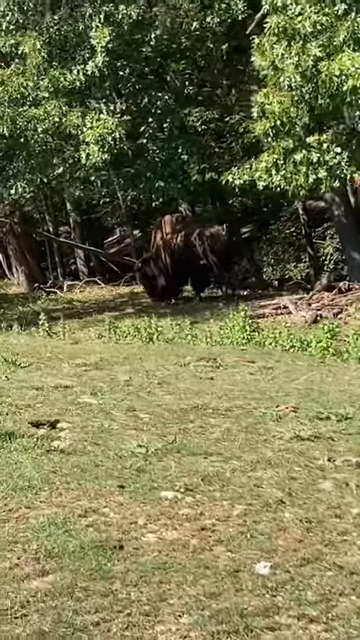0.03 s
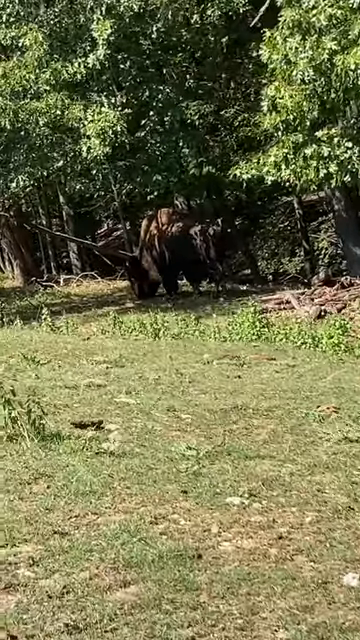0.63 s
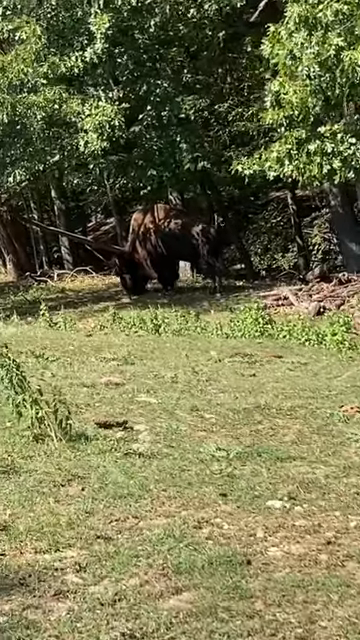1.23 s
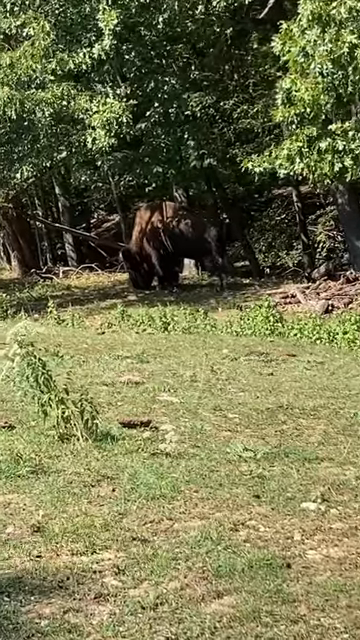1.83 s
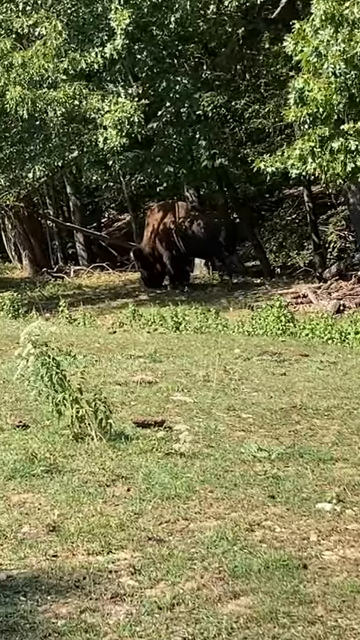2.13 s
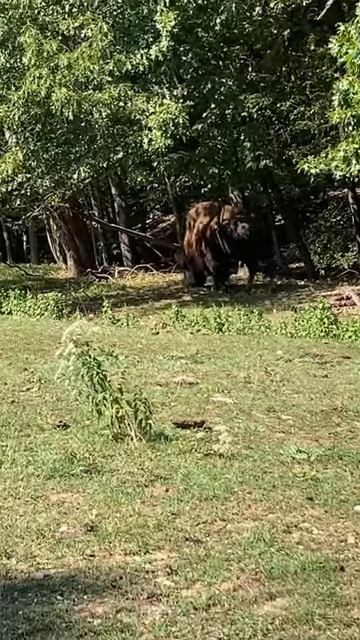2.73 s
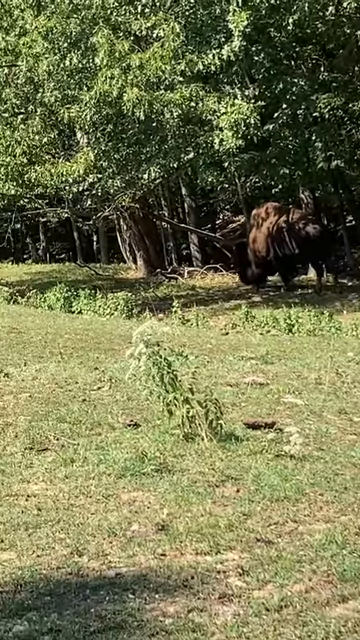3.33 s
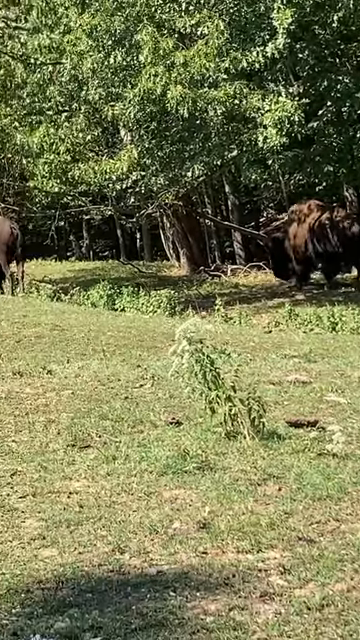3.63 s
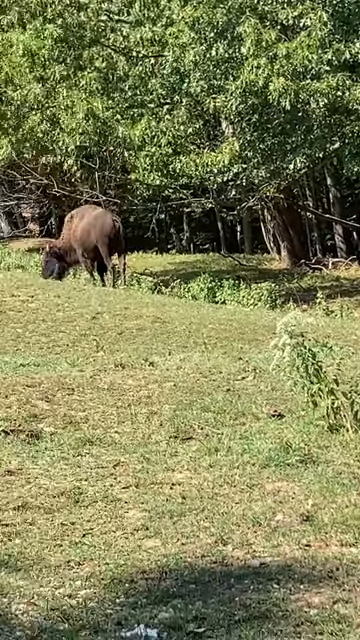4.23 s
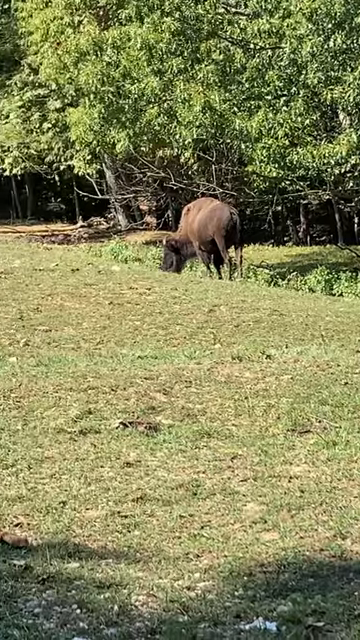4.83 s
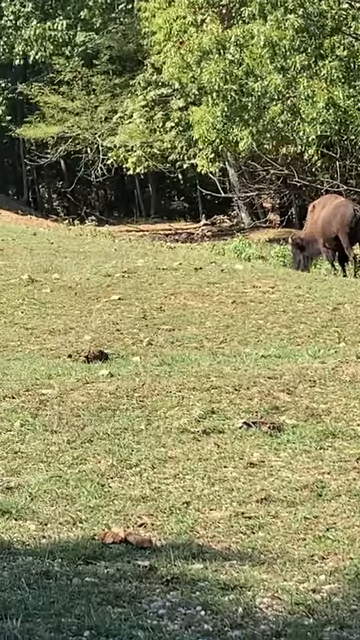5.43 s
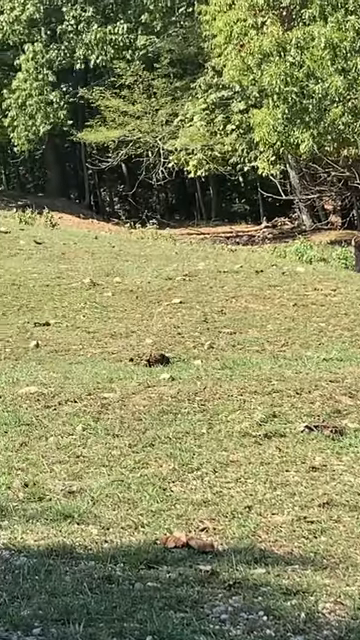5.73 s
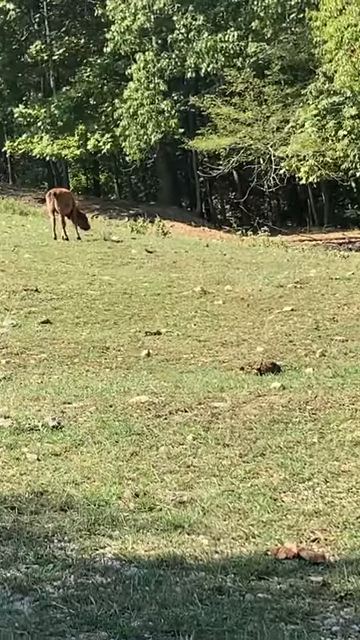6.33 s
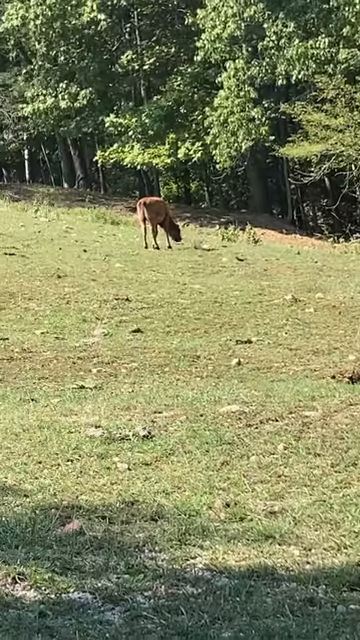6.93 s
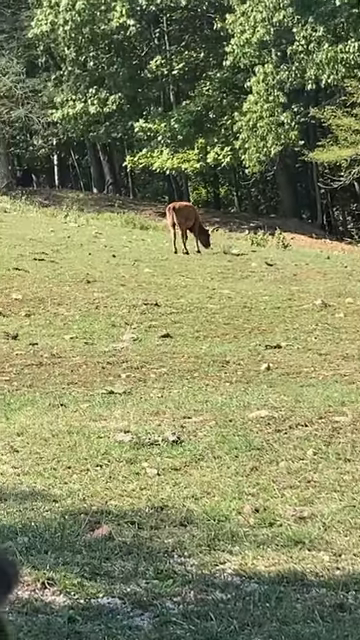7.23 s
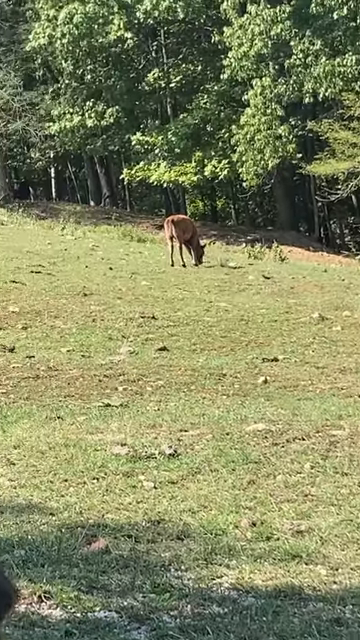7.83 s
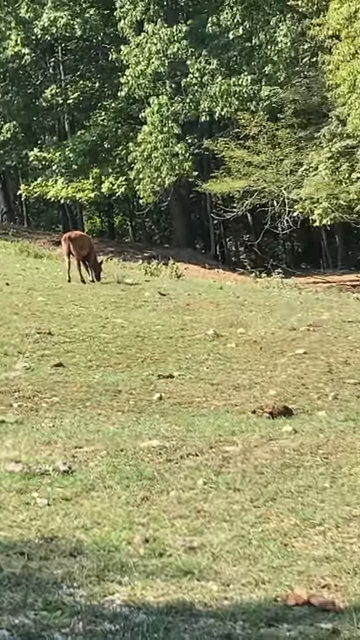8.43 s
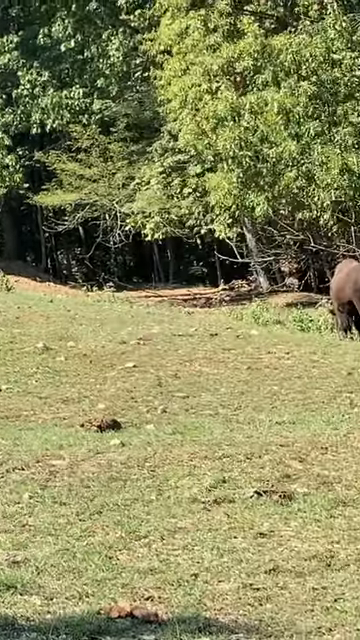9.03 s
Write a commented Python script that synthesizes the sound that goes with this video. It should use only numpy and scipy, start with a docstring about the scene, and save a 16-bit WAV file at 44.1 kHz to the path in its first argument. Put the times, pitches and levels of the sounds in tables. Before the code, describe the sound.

A vehicle engine idles close by in an open field for the whole nine seconds, a low exhaust hum with soft knocking, light clatter and a faint airy hiss behind it. The boom swells just before 1 second, dips briefly and returns at about 1.7 seconds. In the first two seconds a loose metal panel rings faintly three times, slightly to the left, and the engine sags to a slower throb. It stays there from about 2 to 6 seconds, the boom gently rising and falling. Around 6 seconds the engine picks up a little, the boom peaks, and a thin cover whirrs and chirps a bit more, though still quietly. The slightly faster idle then holds steadily to the end, with the panel still giving an occasional faint ring.

```python
"""A three-cylinder engine idles close by in an open field. From the start its exhaust hums and booms,
one cylinder knocks and the block clatters with the firings, under an airy hiss that leads on the left.
In the first two seconds a loose panel sings out three times and the engine sags to a slow throb.
Around 6 s it picks up again: the boom peaks and a thin cover whirrs and chirps louder.
It holds that fast idle to the end, the panel still ringing now and then."""
import sys
import numpy as np
from scipy import signal
from scipy.fft import rfft, irfft, next_fast_len
from scipy.io import wavfile
from scipy.ndimage import uniform_filter1d, map_coordinates

SR = 44100
rng = np.random.default_rng(int(sys.argv[2]) if len(sys.argv) > 2 else 0)


def int16_out(signal):
    """Quantize to a 16-bit WAV file."""
    q = np.round(np.clip(np.atleast_2d(signal).T, -1, 1) * 32767)
    wavfile.write(sys.argv[1], SR, q.astype(np.int16))


N = 405279
TIME = np.arange(N) / SR
SLOW_RPM, FAST_RPM = 1128, 1190  # slow and fast idle: pace 0 and pace 1


def amp(db):
    """Decibels to gain."""
    return 10 ** (np.asarray(db) / 20)


def unit(x):
    """x at rms 1."""
    return x / np.sqrt(np.mean(x ** 2) + 1e-20)


def along(points, hz):
    """Read (f/Hz, value) points on a log frequency axis."""
    freqs, values = np.transpose(points)
    return np.interp(np.log(hz + 1), np.log(freqs + 1), values)


def automation(points):
    """A line through (t/s, value) points, one value a sample."""
    return np.interp(TIME, *np.transpose(points))


def fade(start, length, ramp_s):
    """An envelope that rises, holds and falls, its ramps centred on the start and the end."""
    return np.clip(np.minimum(TIME - start, start + length - TIME) / ramp_s + .5, 0, 1)


def wobble(rate):
    """A smooth random curve, rate knots a second."""
    return map_coordinates(rng.standard_normal(int(N * rate / SR) + 4), [np.arange(N) * rate / SR])


def filtered(x, response):
    """x through a complex frequency response."""
    size = next_fast_len(N + SR // 2)
    return irfft(rfft(x, size) * response(np.fft.rfftfreq(size, 1 / SR)), size)[..., :N]


def coloured(x, spectrum):
    """x through an EQ curve, at rms 1."""
    return unit(filtered(x, lambda hz: amp(along(spectrum, hz))))


def ringing(x, modes):
    """x through (f/Hz, width/Hz, level/dB) resonances, at rms 1."""
    def response(f):
        return sum(amp(db) * 1j * f * width / (hz * hz - f * f + 1j * f * width)
                   for hz, width, db in modes)
    return unit(filtered(x, response))


def cyclic_noise(cycle, repeat_db, size=4096):
    """Two noises that partly repeat every engine cycle, as the same parts strike again."""
    loops = rng.standard_normal((2, size))
    repeats = np.array([map_coordinates(loop, [cycle % 1 * size], mode="grid-wrap") for loop in loops])
    return unit(amp(repeat_db) * repeats + rng.standard_normal((2, N)))


def firing(cycle, depth_db, uneven_db):
    """Tremolo from the three firings of a cycle, one cylinder harder than the others."""
    angle = 2 * np.pi * cycle
    return unit(amp(depth_db * np.cos(3 * angle) + uneven_db * np.cos(angle)))


# Stereo image, 1 being fully alike: f/Hz, left-right likeness
LIKENESS = [(100, 0.81), (280, 0.98), (700, 0.59), (1500, 0.92), (2300, 0.71), (3100, 0.18), (4100, 0.47),
            (4800, 1), (5400, 1), (6800, 0.84), (8200, 0.99), (10000, 1), (11400, 1), (12500, 1),
            (15000, 0.28)]
# How far the left side runs ahead: f/Hz, phase/rad
LEFT_LEAD = [(100, 0), (300, .05), (780, .7), (1600, .7), (2350, 3.2), (3300, 4.3), (4300, 2.45),
             (4900, 3.0), (5500, 3.3), (6700, 4.3), (8200, 6.2), (9400, 6.8), (10700, 8.1), (11300, 9.3),
             (12400, 9.55), (13100, 10.2), (14000, 12.3)]
def stereo(pair, lead=1):
    """Two unrelated signals become left and right: alike in the bass, the left leading in the treble."""
    def spread(hz):
        angle = np.arccos(np.clip(along(LIKENESS, hz), -1, 1)) / 2
        return np.array([np.cos(angle), np.sin(angle)])
    mid, side = filtered(pair, spread)
    left_right = np.array([mid + side, mid - side])
    return filtered(left_right, lambda hz: np.exp(.5j * lead * np.outer([1, -1], along(LEFT_LEAD, hz))))


def patchy_noise(depth_db=1.1):
    """Two noises whose colour drifts in slow patches."""
    spectra = signal.stft(rng.standard_normal((2, N)), nperseg=512)[2]
    patches = uniform_filter1d(rng.standard_normal(spectra.shape[1:]), size=6, axis=0)
    patches = uniform_filter1d(patches, size=50, axis=1)
    return signal.istft(spectra * amp(depth_db * unit(patches)), nperseg=512)[1][:, :N]


# EQ of the airy hiss: f/Hz, relative level/dB
AIR_EQ = [(1000, -5.5), (2500, -2), (3700, -1.5), (4600, -1), (5300, -1), (6500, -1.5), (7400, -0.9),
          (8200, -0.7), (9300, -6), (11000, -21), (15700, -24)]
# Its fader, before a fixed boost: t/s, level/dB
AIR_FADER = [(0.0, -60), (0.74, -61), (1.56, -61.5), (3.2, -60.5), (4.94, -60.5), (5.99, -62.5),
             (7.2, -59.5), (8.6, -60), (9.19, -58)]
# EQ of the sheen on top: f/Hz, relative level/dB
SHEEN_EQ = [(5000, -8), (8000, -7.5), (9300, 2), (10400, 6.5), (12000, -5), (14000, -5.5), (15700, -14)]
def hiss(cycle):
    """A bed of air under a slowly rising sheen, both fluttering faintly with the firings."""
    air = amp(automation(AIR_FADER) + 6.5) * coloured(patchy_noise(), AIR_EQ)
    sheen = amp(-61.5 + 0.2 * TIME) * coloured(patchy_noise(), SHEEN_EQ)
    bed = (air + sheen) * firing(cycle, depth_db=0.7, uneven_db=0.5) * amp(0.28 * wobble(11))
    shift = np.clip(TIME - 6.66 + .5, 0, 1)  # the image shifts slightly over one second
    return (1 - shift) * stereo(bed) + shift * stereo(bed, lead=0.96)


def loose_part(cycle, db, hz, width_hz):
    """One sharp resonance shaken by the engine, chattering as its contact comes and goes."""
    mode = [(hz, width_hz, 0)]
    shake = cyclic_noise(cycle, repeat_db=-12) * firing(cycle, depth_db=-1.5, uneven_db=-0.5)
    chatter = amp(2 * wobble(45))
    return amp(db) * unit(ringing(ringing(shake, mode), mode) * chatter)


# Fader of the thin cover's chirps, with the whirr just under them: t/s, level/dB
COVER_FADER = [(0, -64), (2.8, -61), (5, -61), (6.4, -58), (7.1, -63.5), (8.6, -59), (9.19, -63)]
def thin_cover(cycle, hz=2920):
    """A thin cover whirrs high and chirps as each firing flicks it, now lightly, now hard."""
    level_db = automation(COVER_FADER)
    whirr = loose_part(cycle, level_db - 2, hz, width_hz=60)
    firings = np.floor(3 * cycle + .1 * wobble(25))  # a little play in the timing
    force = amp(4 * np.clip(wobble(30), -2, 1.5))
    flicks = np.diff(firings, prepend=firings[0]) * force
    chirps = amp(level_db) * ringing(ringing(flicks, [(hz, 70, 0)]), [(hz, 220, 0)])
    return stereo(whirr + np.array([chirps, np.zeros(N)]))


# Cues where the panel catches and sings: t/s, length/s, level/dB
PANEL_CUES = [(.38, 0.36, -63), (1.062, .17, -55), (1.46, .23, -56), (3.25, .7, -62), (4.28, 0.49, -63),
              (5.7, 0.37, -63), (6.121, .17, -58), (6.65, 0.14, -58), (6.9, 0.4, -65), (7.521, 0.33, -58),
              (8.18, 0.47, -62), (8.76, 0.13, -57)]
def panel(cycle, pace):
    """A loose panel buzzes faintly, and now and then swells into a fluttering metallic ring."""
    buzz = loose_part(cycle, db=-63 + 2.5 * pace, hz=1086.7, width_hz=48)
    envelope = sum(amp(db) * fade(start, length, ramp_s=.09) for start, length, db in PANEL_CUES)
    pitch_hz = 1086 + 11 * wobble(40)
    tone = np.sin(2 * np.pi * np.cumsum(pitch_hz) / SR)
    flutter = firing(cycle, depth_db=3, uneven_db=3.5) * amp(3 * wobble(45))
    ring = envelope * unit(tone * flutter)
    return stereo(buzz + np.array([ring, np.zeros(N)]))


# EQ of the body's low shudder: f/Hz, relative level/dB
SHUDDER_EQ = [(15, -16), (30, -28), (55, -1.5), (100, -0.5), (150, -5), (250, -5), (310, -13.5),
              (450, -27.5), (900, -44.5)]
def shudder(cycle):
    """The body shakes with every cycle, a soft rumble under the hum."""
    return amp(-47.5) * coloured(cyclic_noise(cycle, repeat_db=-18), SHUDDER_EQ)


# EQ of the block's broad clatter: f/Hz, relative level/dB
CLATTER_EQ = [(150, -21), (340, 1.5), (450, 0.95), (620, 1.5), (820, -2), (1250, -3.5), (1620, -6),
              (1850, -9), (2600, -12), (3300, -23), (5000, -41), (10000, -54)]
# Resonances of the block and its covers: f/Hz, width/Hz, relative level/dB
BLOCK_MODES = [(675, 13, -9), (1012, 16, -5), (1304, 21, -2.5), (1444.5, 18.5, 2.5), (1488, 23, -0.5),
               (1639, 18.5, 0.5), (2006, 38, -1.5), (2352, 18, 0), (2742, 23, -3), (3010, 95, -17),
               (3943, 17.5, -3.5)]
def block(cycle, pace):
    """Valves and combustion rattle the block and ring its covers, harder at higher speed."""
    rattle = cyclic_noise(cycle, repeat_db=-5) * firing(cycle, depth_db=0.7, uneven_db=0.26)
    strikes = cyclic_noise(cycle, repeat_db=-11.5) * firing(cycle, depth_db=1.7, uneven_db=1.0)
    clatter = amp(-51 + 1.36 * pace) * coloured(rattle, CLATTER_EQ)
    return clatter + amp(-56 + .6 * pace) * ringing(strikes, BLOCK_MODES)


def knock(cycle, pace, hz=233, width_hz=90, scatter_db=2.5):
    """One cylinder thumps the muffler shell halfway through each cycle, never twice alike."""
    blows = np.diff(np.floor(cycle + .5), prepend=0) * amp(scatter_db * wobble(7.3))
    shell = [(hz, width_hz, 0)]
    return amp(-61.5 + 2 * pace) * ringing(ringing(blows, shell), shell)


# Weak partials between the firing orders, at slow idle: f/Hz, level/dB
UNEVEN_PARTIALS = [(47, -57), (100, -60.5), (160, -59), (200, -63.5), (260, -64.5), (330, -71.5)]
def uneven_hum(cycle):
    """No cylinder fires quite like the others, so faint partials fill in between the firing orders."""
    hum = np.zeros(N)
    for order in range(5, 36):
        if order % 3:
            level_db = along(UNEVEN_PARTIALS, order * SLOW_RPM / 120)
            hum += amp(level_db) * np.sin(2 * np.pi * (order * cycle + rng.random()))
    return np.sqrt(2) * hum


# The boom rides the load, at twice the firing rate: t/s, level/dB
BOOM_FADER = [(0.0, -54), (0.38, -50), (0.54, -36.5), (0.88, -32), (1.37, -50), (1.66, -33.5), (2.0, -39.5),
              (2.33, -42), (2.88, -34), (3.23, -40), (3.8, -35.3), (4.5, -35), (5.1, -34), (5.5, -33),
              (6.25, -31), (6.85, -39.5), (7.1, -37), (9.19, -38.5)]
# Dips and swells of its octave: t/s, length/s, added level/dB
OCTAVE_RIDES = [(.5, 0.63, -8), (3.8, 1.1, 2.5), (5.4, 0.76, 5)]
def boom_levels(rpm):
    """Levels in dB of the exhaust's boom and of the octave that follows it."""
    boom_db = automation(BOOM_FADER)
    follow_db = 0.74 * (boom_db - boom_db.mean())
    notch_db = -10.5 * np.exp(-((rpm - 1176) / 7) ** 2)  # the pipe cancels the octave at one speed
    ride_db = sum(db * fade(start, length, ramp_s=0.3) for start, length, db in OCTAVE_RIDES)
    return boom_db, -43 + follow_db + notch_db + ride_db


# Partials of the hum: order (multiple of the cycle rate), slow-idle level/dB, fast-idle level/dB
HUM_PARTIALS = [(3, -59, -57.5), (4, -60, -45.5), (9, -44, -40.8), (15, -63, -57), (18, -46.5, -42),
                (21, -49.2, -63), (23, -63, -59), (24, -57.5, -61.5), (27, -62.5, -65), (36, -69, -64),
                (45, -67, -67), (61, -78, -65), (63, -77, -66.5), (66, -64.5, -64), (69, -73, -72),
                (72, -66, -65.5), (87, -76, -70), (106, -68, -70), (109, -80, -65), (113, -71, -80),
                (130, -78, -69)]
# Trim on those partials: t/s, level/dB
HUM_TRIM = [(0, -5), (.75, -1), (1.15, -1), (2.3, -0.5), (3.2, -0.5), (9.19, 0)]
def exhaust(cycle, rpm, pace, waver_db=0.1155, slip_rad=1.6):
    """Clean engine orders: at slow idle they line up into a throb, at fast idle the boom slips behind."""
    trim_db = automation(HUM_TRIM)
    partials = [(round(order), trim_db + slow_db + pace * (fast_db - slow_db), 0)
                for order, slow_db, fast_db in HUM_PARTIALS]
    partials += [(order, db, slip_rad * pace) for order, db in zip((6, 12), boom_levels(rpm))]
    hum = np.zeros(N)
    for order, db, slip in partials:
        waver = waver_db * np.sqrt(order) * wobble(7)  # high orders are the least steady
        lag = .85 + .319 * order ** 2 + slip  # the muffler holds back high orders, smearing each pulse
        hz = order * rpm / 120
        whine_db = 4 * np.exp(-((hz - 672) / 12) ** 2)  # a cover resonance lifts a passing partial
        hum += amp(db + waver + whine_db) * np.sin(2 * np.pi * order * cycle - lag)
    return np.sqrt(2) * hum


def pan(left_db):
    """Gains that raise the left and lower the right by left_db each."""
    return amp([[left_db], [-left_db]])


# The crankshaft sags and picks up: t/s, speed/rpm
CRANK_SPEED = [(0, 1167), (.3, 1174), (.45, 1190), (.68, 1141), (1.0, 1187), (1.2, 1202), (1.5, 1158),
               (2, 1113), (2.5, 1124), (3.5, 1120), (5.85, 1138), (6.5, 1193), (7.2, 1189), (7.6, 1188),
               (9.19, 1194)]
# Group trim on the uneven hum, knock, clatter and shudder: t/s, level/dB
RATTLE_TRIM = [(0, -1), (1, -1), (2, -1), (3, 0), (5, -0.14), (6.5, -0.06), (9.19, -0.5)]
def scene():
    """The mix: one crankshaft clocks every layer."""
    rpm = automation(CRANK_SPEED)
    hunting = 1 + 0.0007 * wobble(12)  # no two cycles take quite the same time
    cycle = np.cumsum(rpm * hunting / 120) / SR  # two turns make one four-stroke cycle
    pace = np.clip((rpm - SLOW_RPM) / (FAST_RPM - SLOW_RPM), 0, 1)
    trim = amp(automation(RATTLE_TRIM))
    hum = exhaust(cycle, rpm, pace) + trim * (uneven_hum(cycle) + knock(cycle, pace))
    loose_metal = panel(cycle, pace) * pan(1.8) + thin_cover(cycle) * pan(-1.8)
    body = stereo(block(cycle, pace)) * pan(.3) + stereo(shudder(cycle))
    return hum * pan(.15) + loose_metal + trim * body + hiss(cycle)


def record(dry):
    """A brick-wall low-pass on the whole mix."""
    return filtered(dry, lambda hz: hz < 15720)


dry = scene()
out = record(dry)
int16_out(out)
```